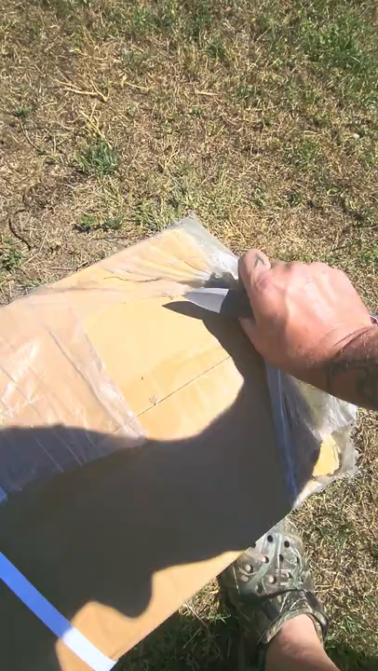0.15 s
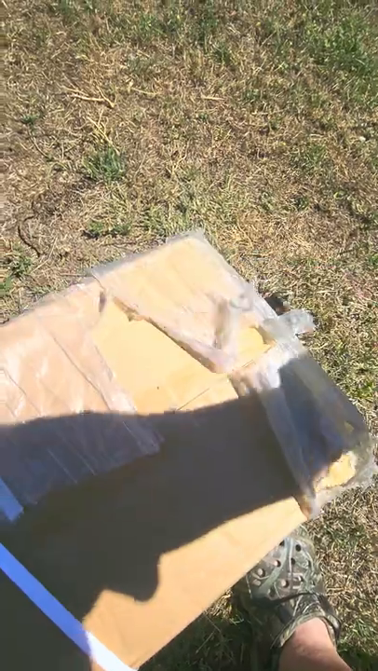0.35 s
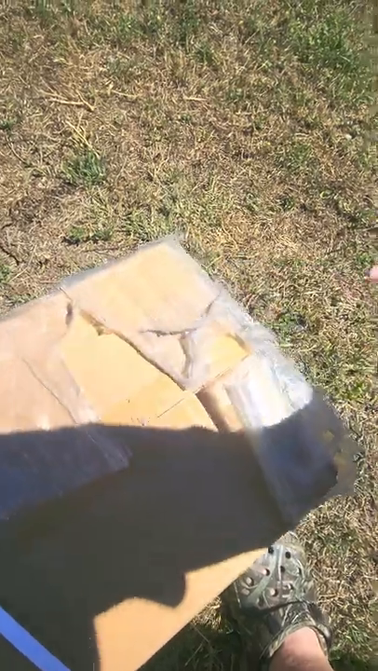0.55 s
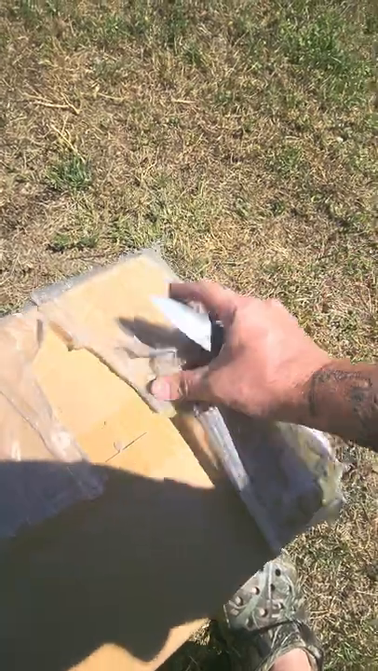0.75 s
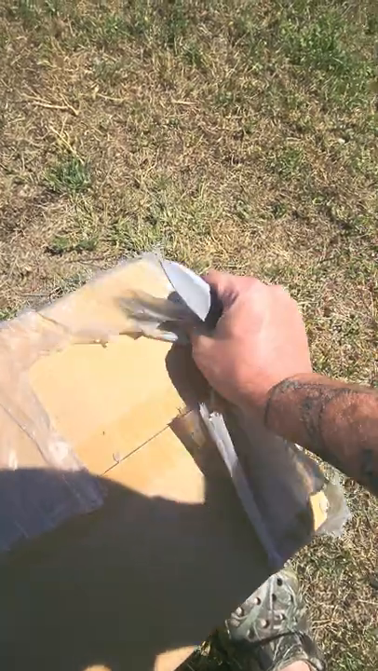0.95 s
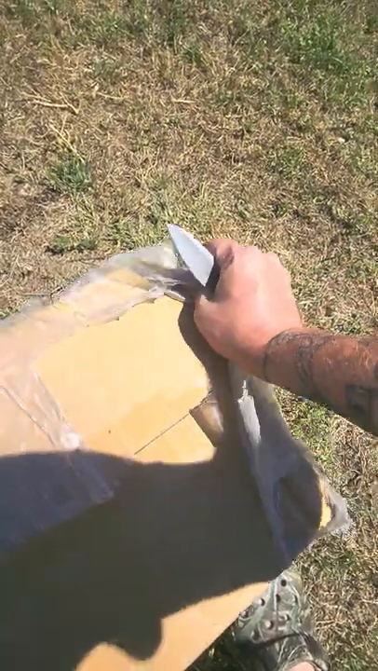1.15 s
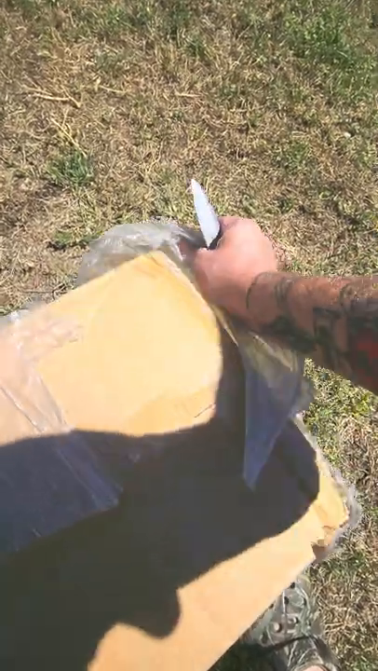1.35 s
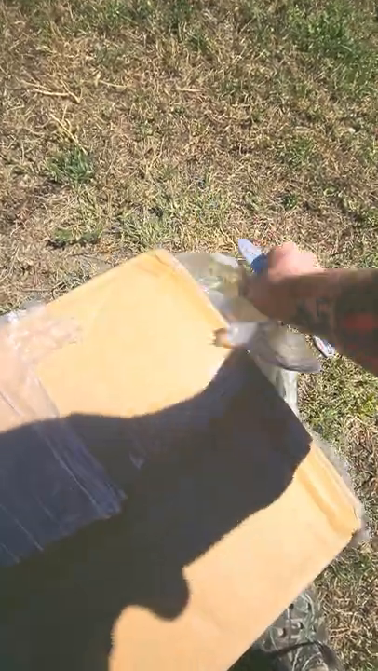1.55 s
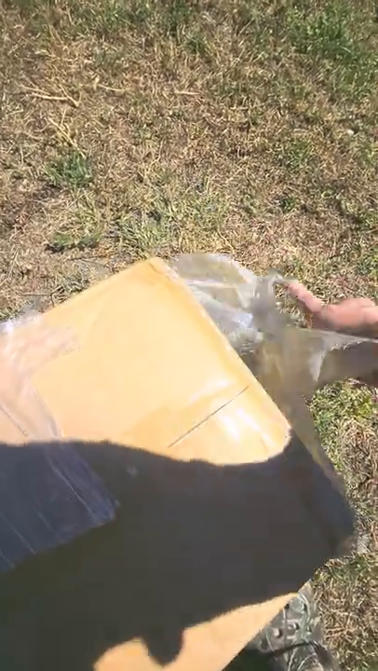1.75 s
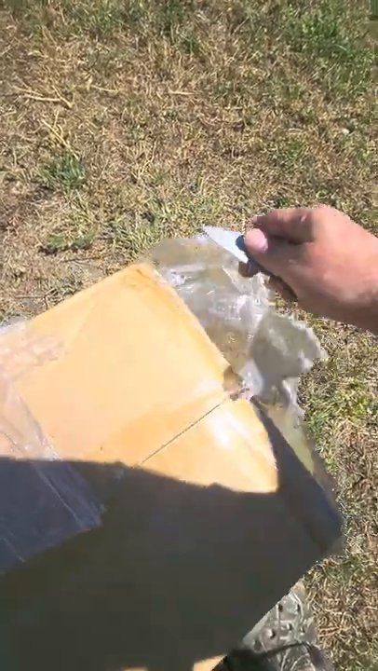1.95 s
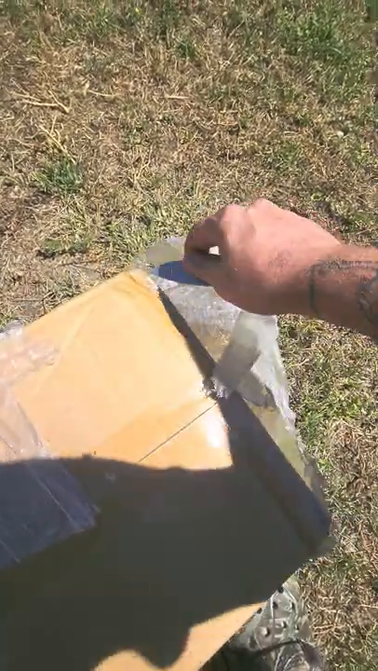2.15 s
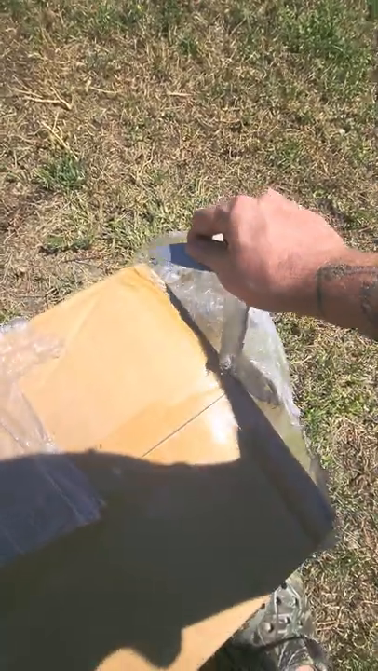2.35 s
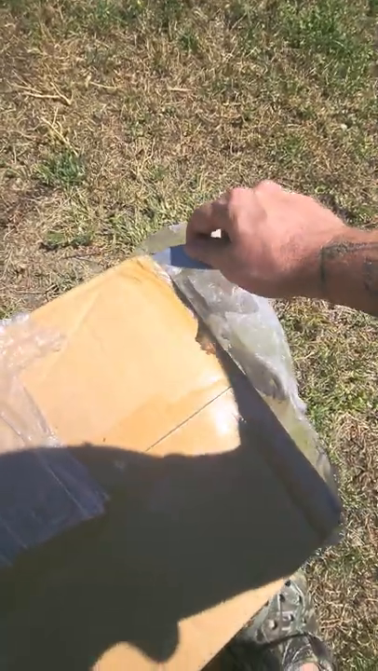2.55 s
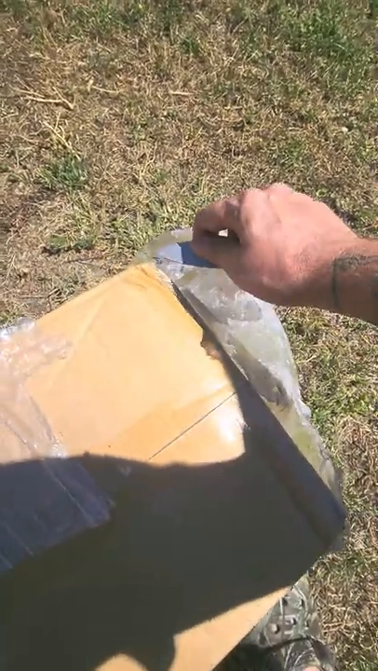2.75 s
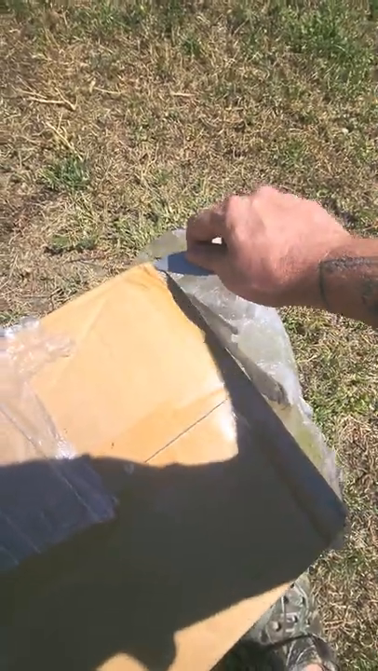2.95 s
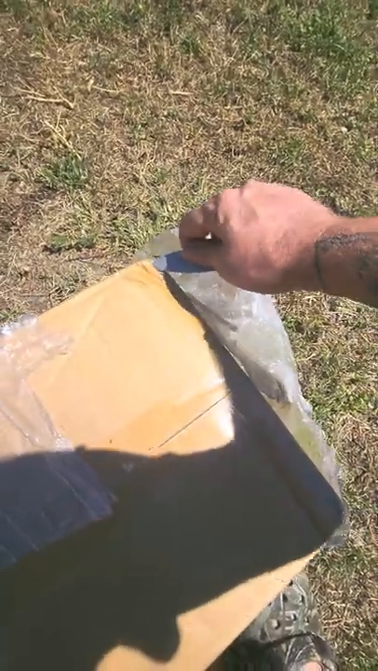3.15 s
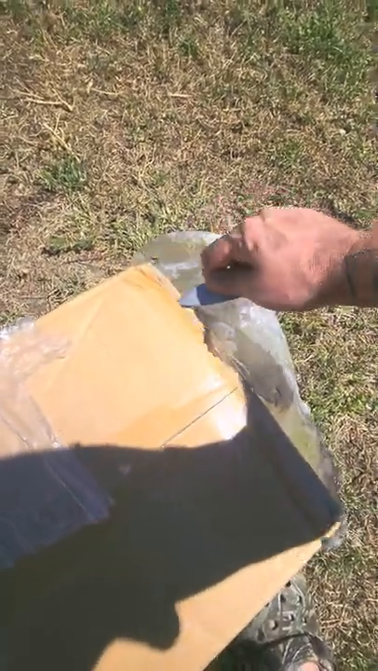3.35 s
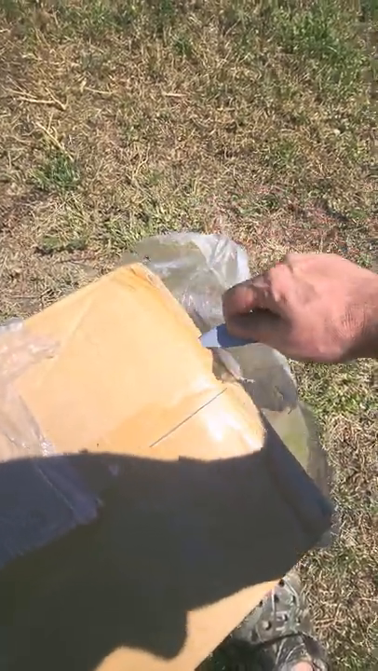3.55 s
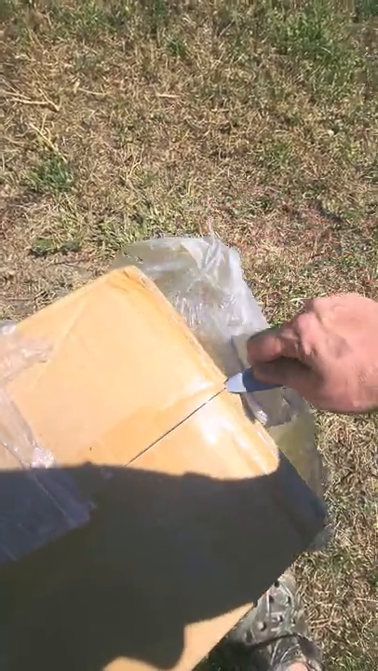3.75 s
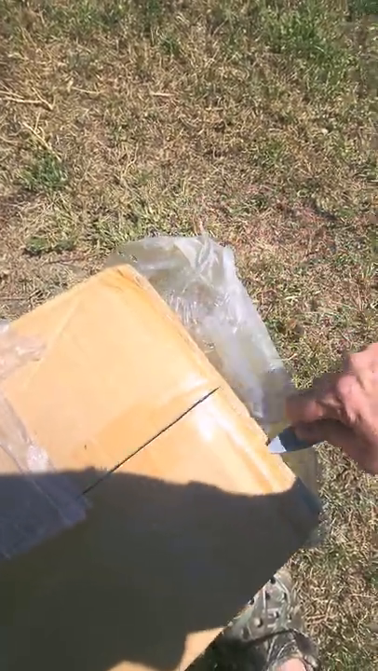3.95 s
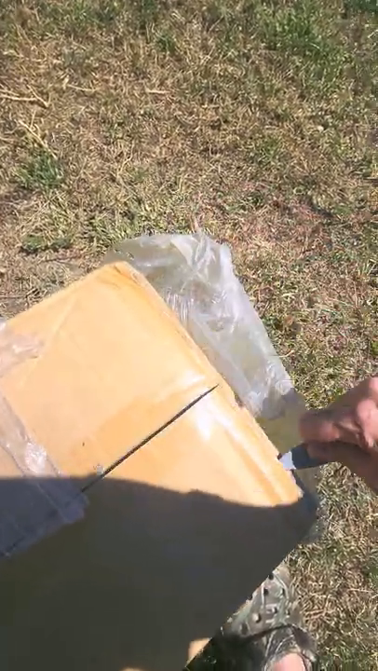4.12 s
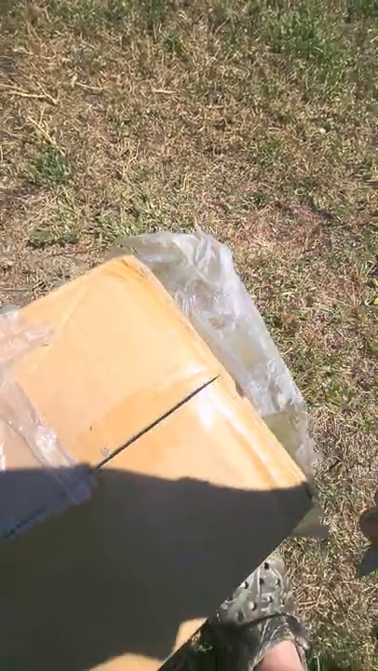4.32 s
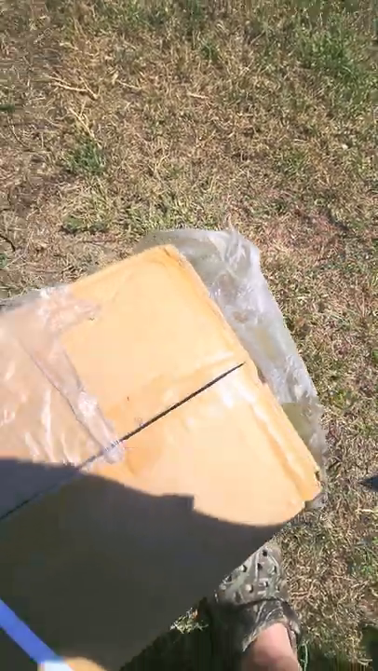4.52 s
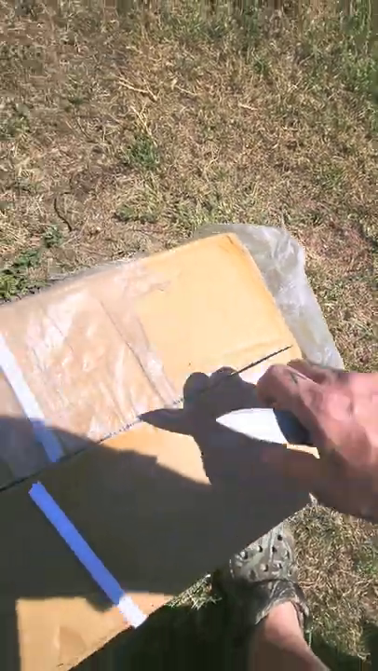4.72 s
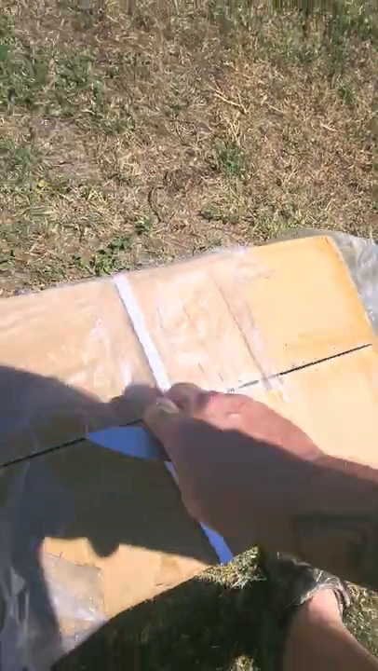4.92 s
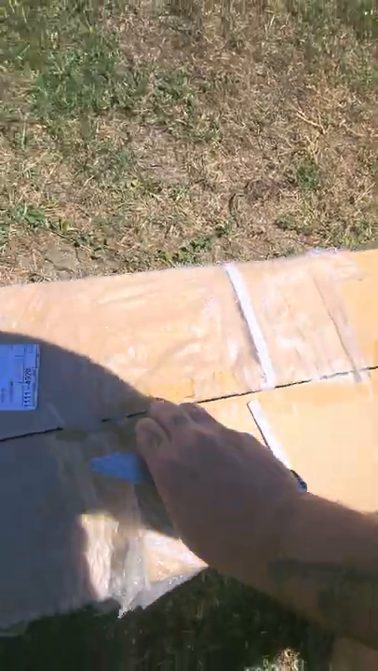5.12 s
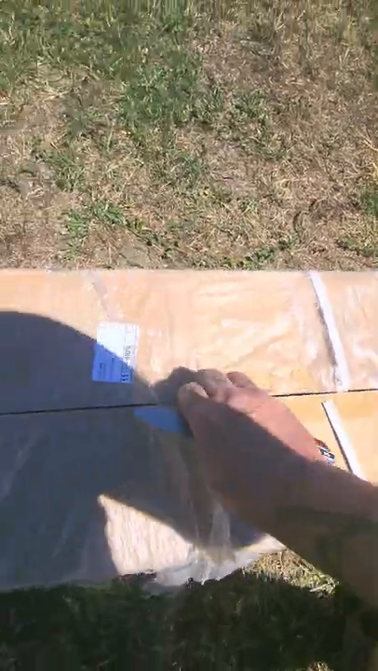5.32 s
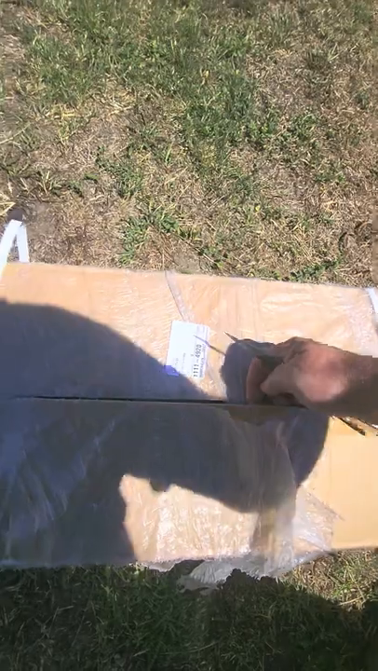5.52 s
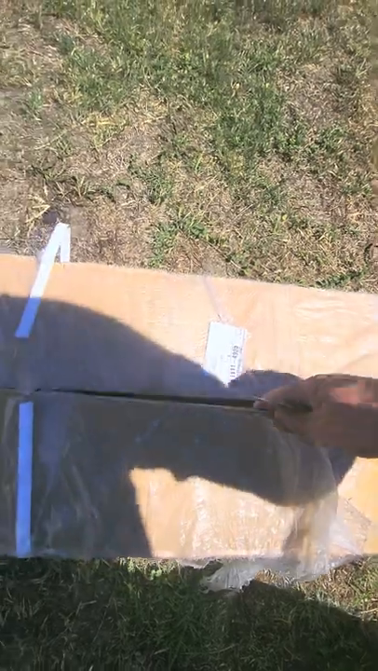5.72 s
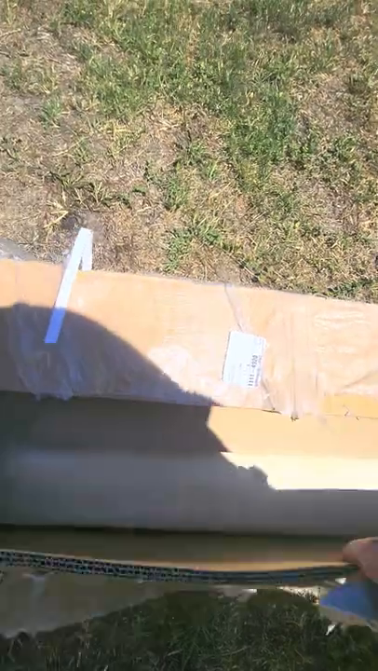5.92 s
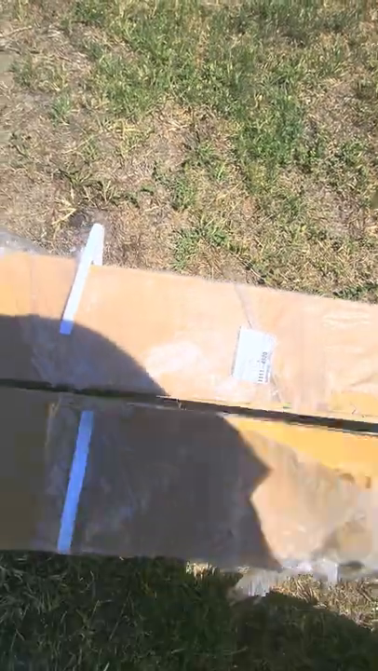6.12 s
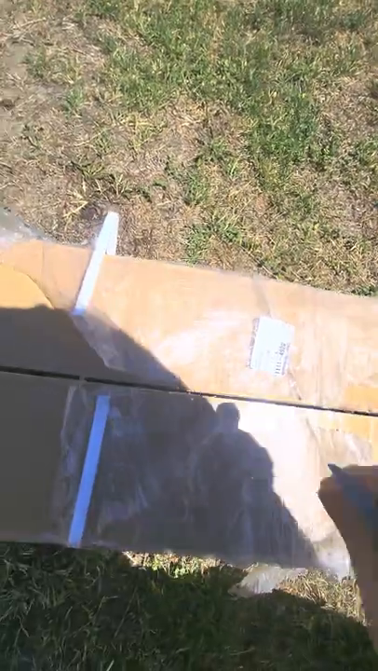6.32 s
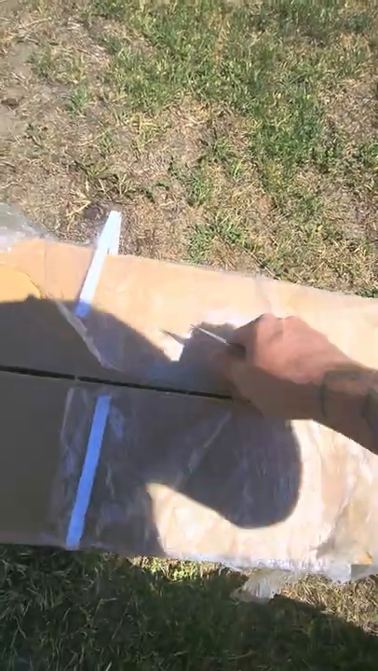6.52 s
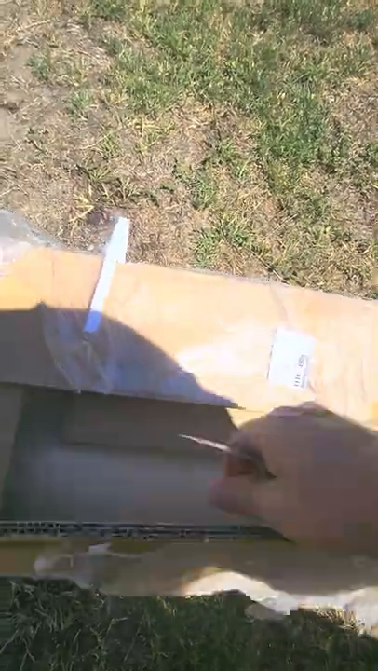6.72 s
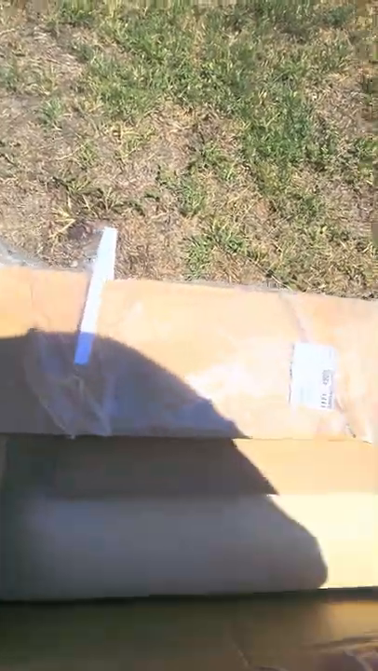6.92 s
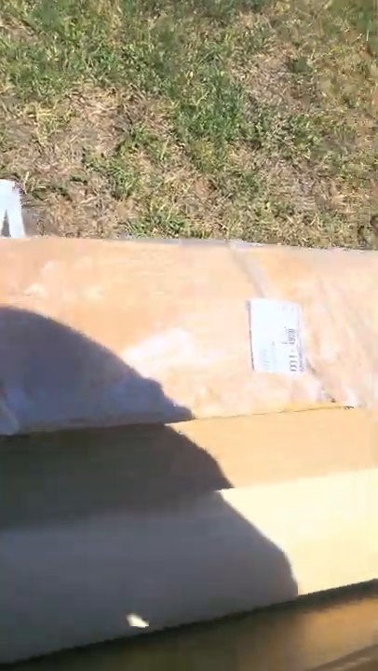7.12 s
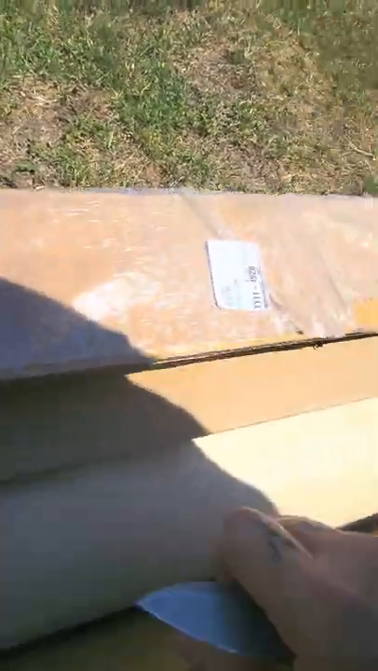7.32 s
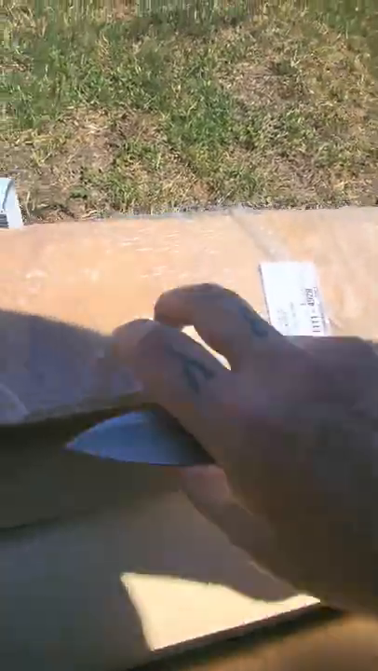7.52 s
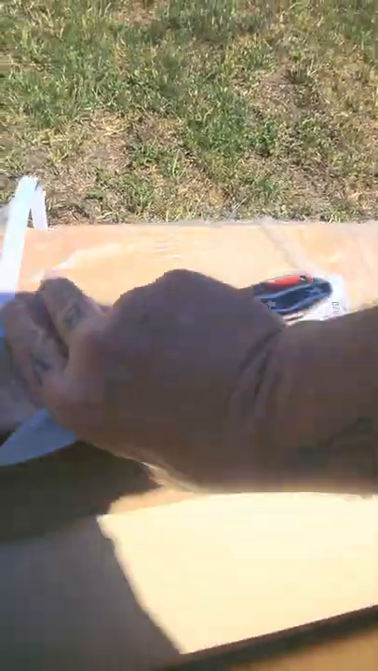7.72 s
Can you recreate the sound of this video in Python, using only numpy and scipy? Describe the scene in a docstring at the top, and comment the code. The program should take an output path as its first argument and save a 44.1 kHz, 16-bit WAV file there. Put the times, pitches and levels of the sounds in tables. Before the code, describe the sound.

Close crinkling plastic, a blade scraping through tape and dull thumps of a cardboard box being opened in a quiet, breezy yard.

```python
"""Unwrapping a box in a quiet yard

Close to two spaced microphones, a hand tears plastic wrap off a cardboard box, slits the tape with
a knife and pulls the flaps open. Film and tape crackle in tiny slips and let go in snaps; the hollow
box booms when knocked. Wind buffets the pair; far off are a hiss, a low hum and a bird."""
import sys
import numpy as np
from scipy import signal
from scipy.fft import rfft, irfft, next_fast_len
from scipy.io import wavfile
from scipy.ndimage import uniform_filter1d

SR = 44100
rng = np.random.default_rng(int(sys.argv[2]) if len(sys.argv) > 2 else 0)


def master(y):
    """Save y as 16-bit WAV."""
    cut = np.clip(np.atleast_2d(y).T, -1, 1)
    pcm = np.round(cut * 32767)  # scale
    wavfile.write(sys.argv[1], SR, pcm.astype(np.int16))


N = 347059


def gain_of(db):
    """Decibels to gain."""
    return 10 ** (np.asarray(db) / 20)


def unit_rms(x):
    """Scales to rms 1."""
    return x / np.sqrt(np.mean(x ** 2) + 1e-20)


def colour(x, points):
    """Filters by a spectrum of (f/Hz, level/dB) points."""
    size = next_fast_len(x.shape[-1])
    f, db = np.transpose(points)
    bin_hz = np.fft.rfftfreq(size, 1 / SR)
    response = gain_of(np.interp(np.log(bin_hz + 1), np.log(f), db))
    return irfft(rfft(x, size) * response, size)[..., :x.shape[-1]]


def drift(hz):
    """Slow random wander of rms 1."""
    return unit_rms(signal.lfilter(*signal.butter(2, hz, fs=SR), rng.standard_normal(N + SR))[SR:])


def mic_gains(pan_db):
    """Gains at the left and right microphones; positive is left."""
    return gain_of(np.outer([.5, -.5], pan_db))


def three_bands(x):
    """Box panel, crackle and sizzle ranges, each levelled, then placed right of centre."""
    low, low_mid = (colour(x, [(.8 * hz, 0), (1.25 * hz, -40)]) for hz in (800, 4700))
    bands = [(low, -3), (low_mid - low, -4), (x - low_mid, -6)]
    return [mic_gains(pan_db) * unit_rms(band) for band, pan_db in bands]


# each pull, slit or rub at the box: t/s, length/s, first level/dB, last level/dB, material
STROKES = [(0, 0.069, -45, -55, "taut"), (0.068, 0.1, -55, -46, "slack"),
           (0.19, 0.14, -45.5, -42.5, "taut"), (0.351, 0.047, -34, -32.5, "crumpled"),
           (0.901, 0.06, -54, -47, "taut"), (0.978, 0.25, -43.5, -45.5, "taut"),
           (1.232, 0.077, -51.5, -48, "slack"), (1.331, 0.22, -43, -39, "crumpled"),
           (1.574, 0.23, -50, -41.5, "crumpled"), (1.8, 0.79, -60, -87.5, "loose"),
           (3.426, 0.071, -67, -55, "seam"), (3.504, 0.11, -36.5, -41, "blade"),
           (3.638, 0.073, -41.5, -55.5, "blade"), (3.73, 0.08, -50, -43, "blade"),
           (3.858, 0.1, -34.5, -54.5, "blade"), (3.975, 0.081, -39, -41.5, "seam"),
           (4.079, 0.085, -38, -36.5, "seam"), (4.265, 0.037, -48.5, -40.5, "seam"),
           (4.311, 0.059, -37, -35.5, "seam"), (4.409, 0.05, -26, -54.5, "blade"),
           (5.211, 0.075, -75.5, -61.5, "wrap"), (5.36, 0.19, -61, -55, "flap"),
           (5.57, 0.082, -51.5, -37.5, "flap"), (5.674, 0.13, -51, -47, "flap"),
           (5.795, .165, -50.5, -38, "flap"), (5.966, 0.1, -52, -41.5, "seam"),
           (6.061, 0.16, -33, -44.5, "seam"), (6.219, 0.14, -63.5, -55, "loose"),
           (6.813, 0.14, -53, -62.5, "loose"), (6.913, 0.043, -45.5, -42, "flap"),
           (6.961, 0.065, -57.5, -49.5, "wrap"), (7.097, 0.037, -58, -48, "loose"),
           (7.205, 0.12, -56, -62.5, "wrap"), (7.359, 0.048, -47, -45, "lifted"),
           (7.5, 0.44, -61.5, -77.5, "card"), (7.779, 0.09, -58, -48.5, "lifted")]
# material under the hand: panel share/dB, sizzle share/dB
MATERIALS = dict(taut=(-14, 2), slack=(-12, -7.5), crumpled=(-9, -0.44), loose=(-3.6, 5.3), blade=(0, -1.5),
             seam=(-0.8, -0.25), flap=(-1.6, -2.9), wrap=(-2.6, 7.1), card=(15.3, -31), lifted=(-5, -7.5))
# where each material rings: f/Hz
RING_HZ = dict(taut=3090, slack=3340, crumpled=1430, loose=1380, blade=1260, seam=1282, flap=3350, wrap=5900, card=1500, lifted=1420)
REST_DB = -77.5  # faint rustle between strokes
ATTACK_DB_PER_S, RELEASE_DB_PER_S = 1504.5, 908.5
SETTLE_DB, SETTLE_DB_PER_S = -21.5, 92  # the material keeps settling after a stroke
SOFT, SOFT_PACE = ("slack", "loose", "wrap", "card", "lifted"), 0.23  # these come and go more slowly


def hand():
    """Strokes swell, hold and settle: panel, crackle, sizzle, hollow and knife gains, and ring pitch."""
    t = np.arange(0, N + 64, 64) / SR
    rest = (0.022, N / SR, REST_DB, REST_DB, "seam")
    rows = [row[:4] + MATERIALS[row[4]] + (RING_HZ[row[4]],) for row in STROKES + [rest]]
    start, length, first_db, last_db, panel_db, sizzle_db, hz = np.transpose(rows)[:, :, None]
    pace = np.array([[SOFT_PACE if row[4] in SOFT else 1] for row in STROKES] + [[1]])
    before, after = np.maximum(start - t, 0), np.maximum(t - start - length, 0)
    held_db = first_db + (last_db - first_db) * np.clip((t - start) / length, 0, 1)
    tail_db = np.maximum(-pace * RELEASE_DB_PER_S * after, SETTLE_DB - SETTLE_DB_PER_S * after)
    power = gain_of(2 * (held_db - pace * ATTACK_DB_PER_S * before + tail_db))
    gains = [np.sqrt((power * gain_of(2 * share_db)).sum(0)) for share_db in (panel_db, 0, sizzle_db)]
    for kinds in [("lifted", "card"), ("blade", "seam", "flap")]:  # hollow, knife
        chosen = [row[4] in kinds for row in STROKES] + [False]
        gains.append(np.sqrt(power[chosen].sum(0)))
    ring_hz = (power * hz).sum(0) / power.sum(0)
    return [np.interp(np.arange(N) / SR, t, curve) for curve in gains + [ring_hz]]


# spectrum of film and tape at close range: f/Hz, level/dB
CRACKLE_SPECTRUM = [(88, -49), (150, -9.5), (386, 1), (881, -7.5), (1330, -7), (3420, -7), (4750, -10.5),
                    (5900, -6.5), (7220, -5.5), (8790, -16.5), (15300, -10), (16500, -38)]
SLIPS_PER_S = 1400
SMOOTH_GRIT, STICKY_GRIT = 0.42, 0.85  # share of separate clicks in the swish


def slips(sticky):
    """Clumped stick-slip clicks from 16 spots, each with its own ring and path to the microphones."""
    chance = SLIPS_PER_S * gain_of(5 * drift(45)) / SR
    sizes = gain_of(4.84 * np.minimum(rng.exponential(1, N), 4.6))
    impulses = sizes * (rng.random(N) < chance)
    spot = (5 * drift(6) + rng.uniform(0, 4, N)).astype(int) % 16  # the hand wanders
    t, clicks = np.arange(700) / SR, np.zeros((2, N))
    for k, hz in enumerate(rng.permutation(np.geomspace(1350, 7500, 16))):
        ring = rng.standard_normal(700) * gain_of(-60 * t / 0.003)
        ring += 0.4 * np.sin(2 * np.pi * hz * t) * gain_of(-60 * t / 0.014)
        heard = signal.oaconvolve(impulses * (spot == k), ring)[:N]
        clicks += [np.roll(heard, rng.integers(-24, 30)), heard]
    grit = np.clip(SMOOTH_GRIT + (STICKY_GRIT - SMOOTH_GRIT) * sticky, 0, 1)
    swish = rng.standard_normal((2, N)) * gain_of(1.59 * drift(30))
    return colour(grit * unit_rms(clicks) + np.sqrt(1 - grit ** 2) * swish, CRACKLE_SPECTRUM)


def rasp(x, hz, width_hz=400):
    """Stretched film or rubbed card rings in one broad band: shift to 0 Hz, smooth, shift back."""
    carrier = np.exp(2j * np.pi * np.cumsum(hz) / SR)
    pole = np.exp(-np.pi * width_hz / SR)
    return unit_rms((carrier * signal.lfilter([1 - pole], [1, -pole], x / carrier)).real)


# resonances of the gap under a lifted flap, just left of centre: f/Hz, width/Hz, level/dB
FLAP_GAP = [(203, 23, 2), (709, 68, 6.5), (1405, 78, 0.5)]


def strokes():
    """Card, tape and film slip and rasp with each stroke; a lifted flap adds a hollow ring."""
    panel_gain, crackle_gain, sizzle_gain, hollow_gain, knife_gain, ring_hz = hand()
    at_rest = np.sqrt(gain_of(REST_DB) / crackle_gain)
    rubbing = slips(sticky=np.maximum(at_rest, knife_gain / crackle_gain))
    panel, crackle, sizzle = three_bands(rubbing)
    wavering_hz = ring_hz * gain_of(drift(12))
    # overtones fade on high rings
    rings = sum(gain_of(db - (ratio - 1) * ring_hz / 300) * rasp(crackle + sizzle, ratio * wavering_hz)
                for ratio, db in [(1, -8), (1.5, -14.5), (2.6, -6.5)])
    hollow = sum(gain_of(db) * unit_rms(signal.lfilter(*signal.iirpeak(hz, hz / width, SR), rubbing))
                 for hz, width, db in FLAP_GAP)
    surface = panel_gain * panel + crackle_gain * (crackle + rings) + sizzle_gain * sizzle
    return surface + mic_gains(1.3) * hollow_gain * hollow


# wind right on the microphones: t/s, level/dB, left over right/dB
GUSTS = [(0.0, -52.5, -2), (2.132, -48.5, 2.5), (2.988, -44, 9.5), (5.938, -48.5, -8), (6.17, -32, 7),
         (6.35, -52, 15), (6.89, -40, -8.5), (7.66, -41.5, -12.5), (7.85, -31.5, -13)]
# spectrum of the buffeting: f/Hz, level/dB
GUST_SPECTRUM = [(20, -28), (45, 2), (75, 0.5), (130, -9), (220, -22), (450, -38.5), (900, -81)]


def wind():
    """Lumpy low-pitched pressure, partly shared by both microphones."""
    shared, left, right = rng.standard_normal((3, N))
    air = colour(shared + 0.38 * np.array([left, right]), GUST_SPECTRUM) * gain_of(4.2 * drift(5.35))
    times, db, pan_db = np.transpose(GUSTS)
    t = np.arange(N) / SR
    return unit_rms(air) * gain_of(np.interp(t, times, db)) * mic_gains(np.interp(t, times, pan_db))


# spectrum of the open yard, all around the pair: f/Hz, level/dB
YARD_SPECTRUM = [(88, -27.5), (150, -6.5), (528, -18), (1380, -28), (7220, -36.5), (8620, -59),
                 (14700, -43), (16500, -65)]
HISS_DB, HUM_DB, HUM_HZ = -66, -52.5, 109


def yard():
    """Distant hiss, wide across the pair, and a wavering hum in the centre."""
    shared, left, right = rng.standard_normal((3, N))
    hiss = unit_rms(colour(.5 * shared + np.array([left, right]), YARD_SPECTRUM)) * gain_of(drift(2))
    hum_phase = 2 * np.pi * np.cumsum(HUM_HZ + 2 * drift(3.18)) / SR
    hum = np.sin(hum_phase) * gain_of(2 * drift(1.5))
    return gain_of(HISS_DB) * hiss + gain_of(HUM_DB) * hum


# film and tape letting go, close by: t/s, relative level/dB, panel share/dB, sizzle share/dB, t60/s
SNAPS = [(0.3625, -27, 2.5, 4.5, 0.028), (0.4017, -33, -0.5, -0.5, 0.046), (1.5128, -27.5, -3, -4, 0.059),
         (3.298, -29, -4.5, -11, 0.022), (3.3469, -29, -2, -14, 0.057), (3.3949, -27.5, -2.5, -5, 0.054),
         (4.4247, -24.5, -6, -20, 0.064), (5.8257, -27, -7, -1.5, 0.04), (6.07, -10, -7.5, -9, 0.016),
         (6.113, -16.5, -5.5, 0, 0.008), (6.168, -24, 5, -1, 0.03), (6.1751, -22.5, 3, -12.5, 0.062),
         (6.8112, -22.5, -20, -4.5, 0.027)]
# single creases of film ticking: t/s, relative level/dB
CREASE_TICKS = [(1.442, -40.5), (1.4577, -44), (1.4867, -28.5), (2.474, -59), (3.0275, -46), (3.49, -43),
                (3.504, -36.5), (3.5927, -40), (3.629, -50), (3.7736, -45), (3.8602, -37.5), (3.9229, -56),
                (4.102, -42), (4.3196, -39), (4.5155, -57.5), (5.3168, -43.5), (5.547, -46.5), (5.574, -64),
                (5.6883, -40), (5.7552, -39), (5.929, -34), (5.956, -39), (6.1983, -28.5), (6.701, -50),
                (6.8436, -42.5), (6.866, -45.5), (7.22, -43)]
# tone of every tick: panel share/dB, sizzle share/dB, t60/s
TICK_TONE = (-8, 4.5, 0.013)


def snaps():
    """Slips crowd up to one crack and thin out; the box panel answers just after the film."""
    t, out = np.arange(-1000, 3000) / SR, np.zeros((2, N + 4000))
    for start, db, panel_db, sizzle_db, t60 in SNAPS + [row + TICK_TONE for row in CREASE_TICKS]:
        left, right, clumps = rng.standard_normal((3, 4000))
        grit = gain_of(7.5 * np.tanh(unit_rms(uniform_filter1d(clumps, 30))))
        left[1020] = right[1010] = 6.8 / grit[1015]  # the crack reaches the right microphone first
        pair = grit * [left, 0.076 * np.roll(left, 10) + 1.18 * right]
        panel, crackle, sizzle = three_bands(colour(pair, CRACKLE_SPECTRUM))
        tilt = [(900, -.6 * sizzle_db), (4500, 0.67 * sizzle_db)]  # dull snaps lean to the bass
        swell = gain_of(-60 * abs(t) / t60 * np.where(t > 0, 1, 1.8) - 8.8 * (t < 0))
        crack = swell * (1 + 0.33 * np.exp(-abs(t - .0008) / 0.00056))
        parts = [(colour(crackle, tilt), crack, 0), (sizzle, crack, sizzle_db),
                 (panel, np.roll(swell, 60) ** 1.13, panel_db)]
        burst = sum(gain_of(share_db) * unit_rms(band * shape) * np.std(shape)
                    for band, shape, share_db in parts)
        out[:, round(start * SR) - 1000:][:, :4000] += gain_of(db + 5.5) * burst
    return out[:, :N]


# blows on the box, close by: t/s, relative level/dB, boom f/Hz, hardness/dB, left over right/dB
KNOCKS = [(0.94, -38.5, 105, -4.5, 0), (4.306, -29, 88, -9.5, -4), (4.418, -16.5, 86, -2.5, -2.5),
          (4.44, -18, 71.2, -9.5, -3), (5.648, -24, 74, 9, -4.5), (5.758, -30, 77.5, -2.5, -1),
          (6.077, -21.5, 52.6, 1.5, 8.5), (6.165, -14.5, 56.2, -40, 1), (6.188, -17, 47.5, -10, -2),
          (6.699, -27.5, 99.5, 0, -4.5), (6.828, -36.5, 157, -14, 4), (6.953, -36.5, 188, -17, -2),
          (7.221, -41.5, 152, -10, 4), (7.443, -19, 88.6, -15.5, -13), (7.733, -29, 52.6, -6, -14)]
# modes of the cardboard panels: f/Hz, relative level/dB, t60/s
PANEL_MODES = [(197.8, 0.5, 0.12), (285.3, 8, 0.072), (337, 9.5, 0.032), (525, -4, 0.03),
               (619, -0.5, 0.036)]
BOOM_T60_S = 0.11


def knocks():
    """The air in the box booms, dropping quickly onto its pitch; harder blows ring the panels too."""
    t, out = np.arange(9000) / SR, np.zeros((2, N + 9000))
    lag = np.array([[.6], [0]])  # radians: the boom reaches the left microphone later
    bent_time = t + 0.004 * (1 - np.exp(-t / 0.0025))
    attack = 1 - np.exp(-t / 0.005)
    rings = sum(gain_of(db - 60 * t / t60) * np.sin(2 * np.pi * hz * t - 0.73 * lag)
                for hz, db, t60 in PANEL_MODES)
    for start, db, hz, hard_db, pan_db in KNOCKS:
        boom = np.sin(2 * np.pi * hz * bent_time - lag) * gain_of(-60 * t / BOOM_T60_S)
        blow = (boom + gain_of(hard_db - 10.5) * rings) * attack
        out[:, round(start * SR):][:, :9000] += gain_of(db + 10.5) * mic_gains(pan_db) * blow
    return out[:, :N]


# a far bird, alike in both microphones: t/s, f/Hz, level/dB
CHIRPS = [(2.323, 4120, -65), (2.345, 3670, -63), (2.439, 3700, -66), (4.675, 6140, -52),
          (5.044, 2820, -65), (5.068, 2840, -57.5)]


def bird():
    """Short, faint, husky whistles that sag in pitch."""
    t, out = np.arange(1100) / SR, np.zeros(N)
    for start, hz, db in CHIRPS:
        husk = 1 + unit_rms(uniform_filter1d(rng.standard_normal(len(t)), 100)) / 2
        whistle = np.sin(2 * np.pi * hz * (t - 1.2 * t ** 2))
        out[round(start * SR):][:len(t)] += gain_of(db) * np.hanning(len(t)) * husk * whistle
    return out


def scene():
    """The box up close and the yard beyond, at the two microphones."""
    return strokes() + wind() + yard() + snaps() + knocks() + bird()


def record(dry):
    """The input stage rounds off the highest peaks; the band ends at 16 kHz."""
    lowpass = signal.firwin(301, 16000, window=("kaiser", 10), fs=SR)
    return signal.oaconvolve(np.tanh(dry), lowpass[None], "same")


dry = scene()
out = record(dry)
master(out)
```